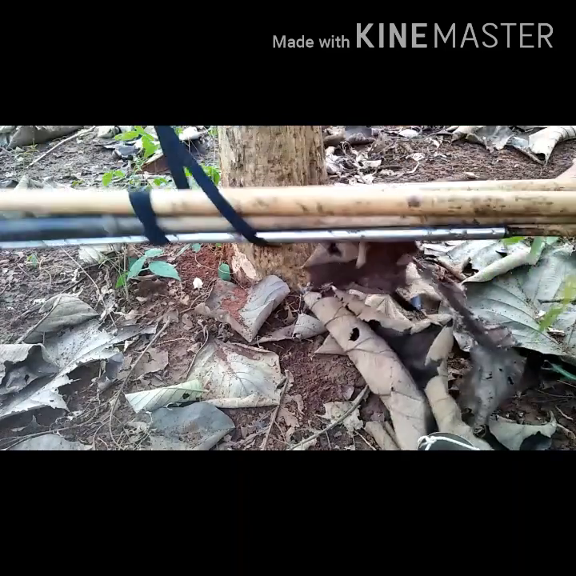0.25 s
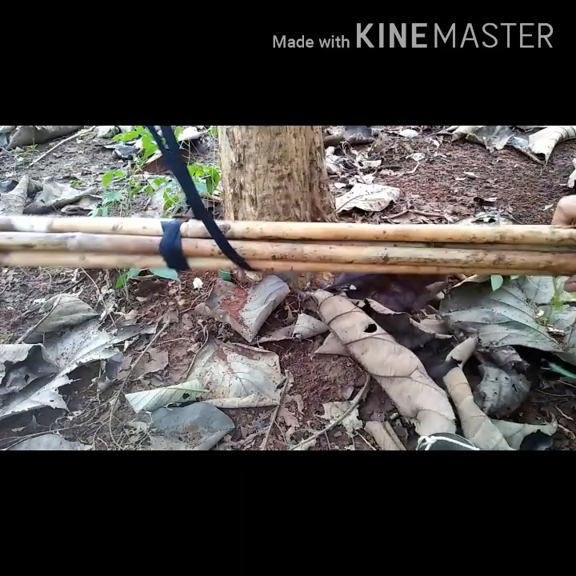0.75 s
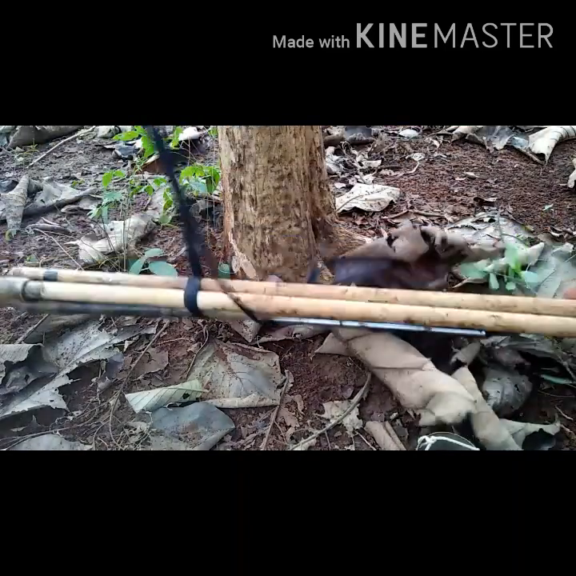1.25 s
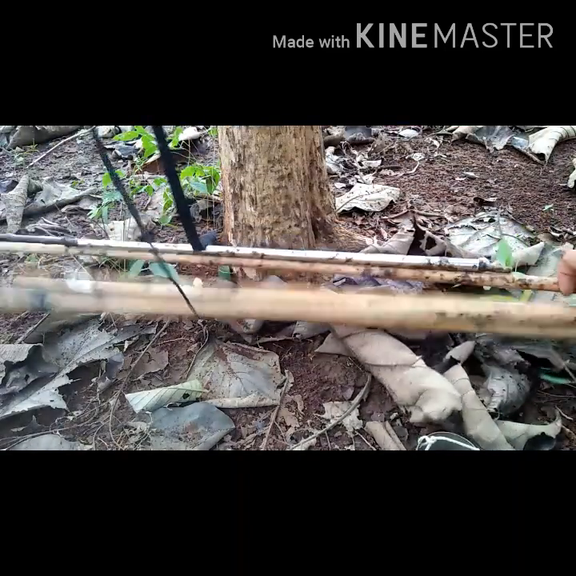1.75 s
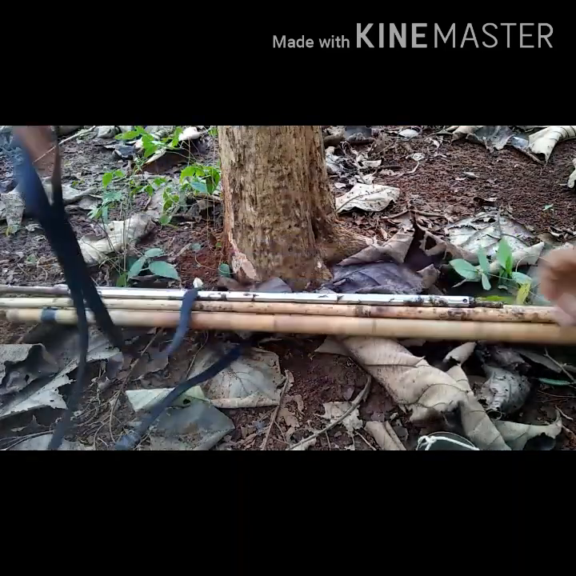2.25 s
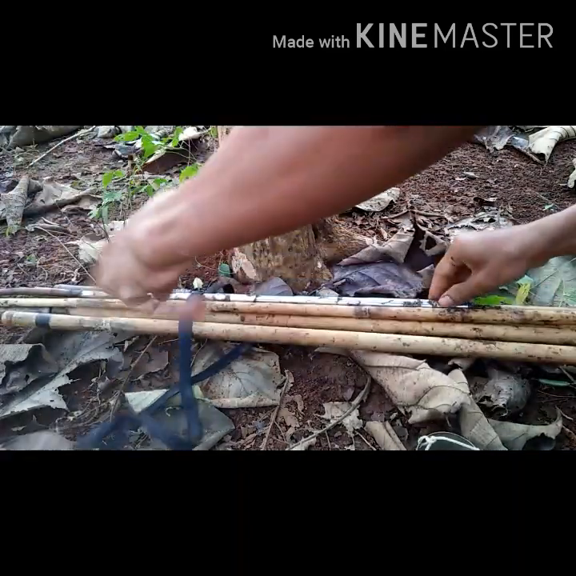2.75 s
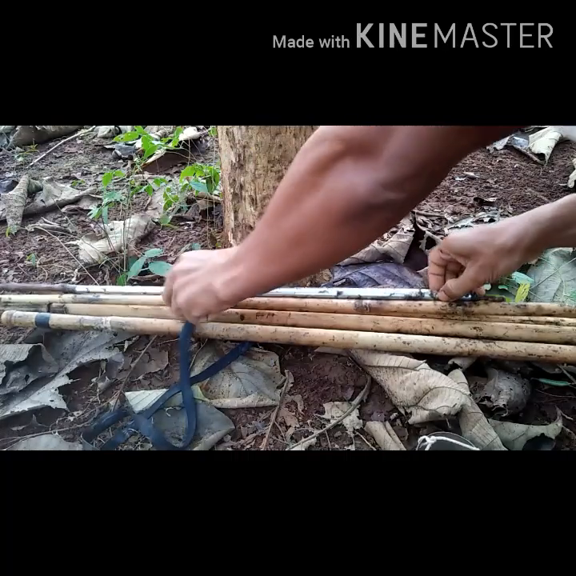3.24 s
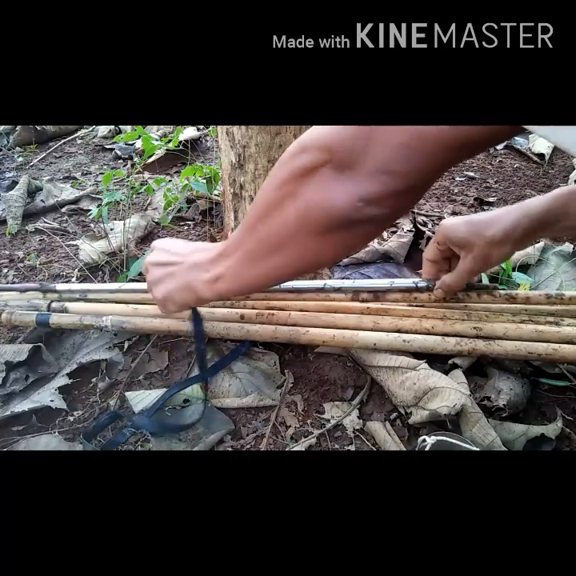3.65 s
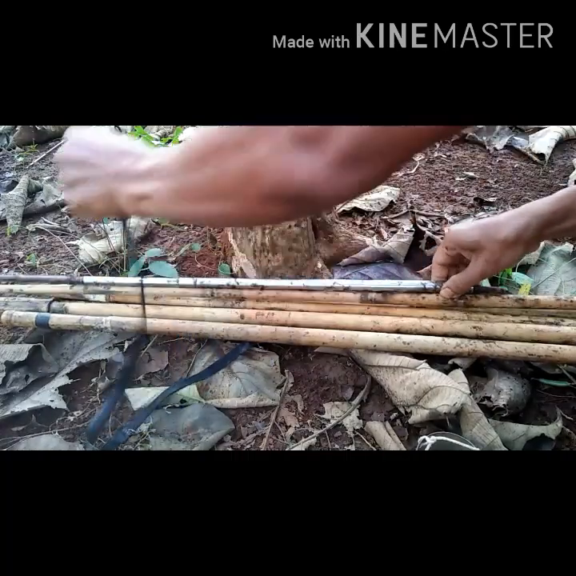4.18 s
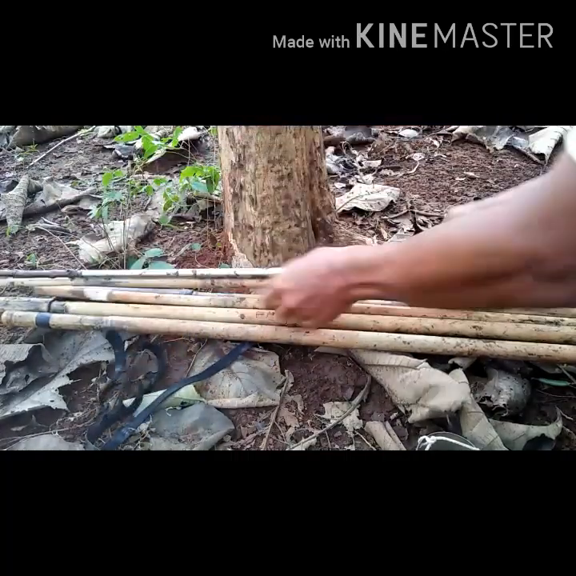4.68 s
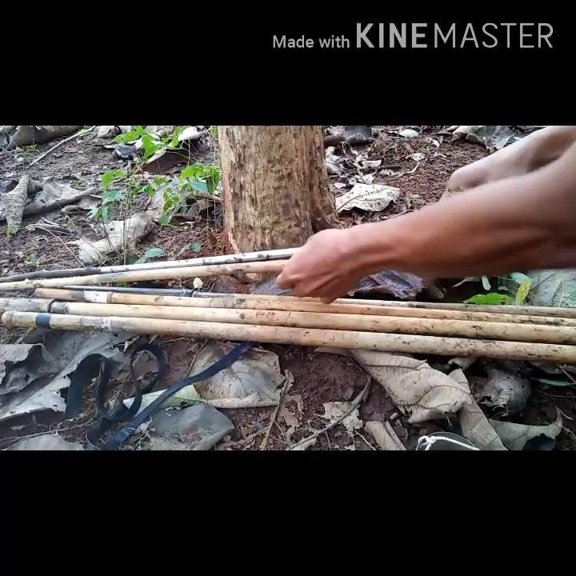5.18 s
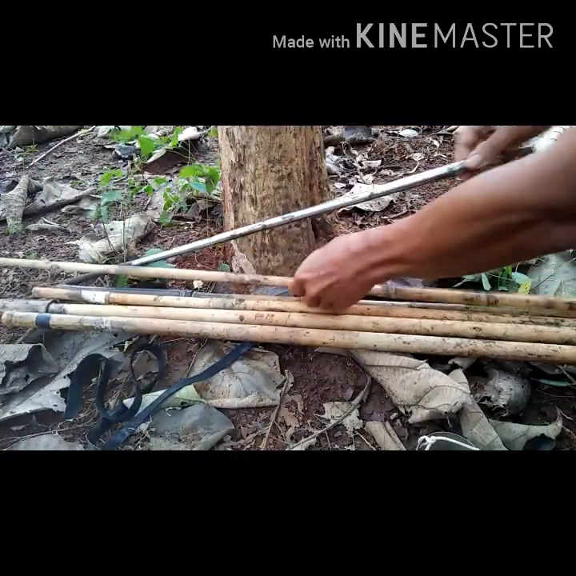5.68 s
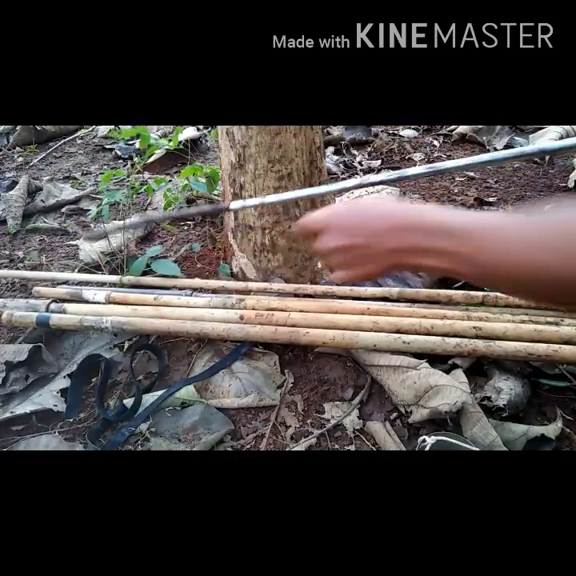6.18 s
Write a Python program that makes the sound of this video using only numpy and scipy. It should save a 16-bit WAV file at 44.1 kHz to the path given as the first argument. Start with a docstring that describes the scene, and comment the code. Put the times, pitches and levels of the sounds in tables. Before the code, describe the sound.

Thin hollow bamboo poles clatter together in a dense burst, then knock loosely while being sorted over rustling dry leaves in quiet woodland.

```python
"""A bundle of thin bamboo poles is lowered onto dry leaves in a wood, unstrapped and sorted, close to a phone.
Rustle, a faint high scrape and a few soft knocks come first; the blows then crowd together and peak near 1.8 s.
After a thin stretch of rustle, a short cluster falls near 4.2 s and a looser one from 5.6 s to the end.
Knocks ring hollow canes and snap their skin; moving hands make poles chatter and leaves and strap rustle in grains.
Throughout, a low rumble comes and goes over quiet air and far insects, and a drone swells out three times."""
import sys
import numpy as np
from scipy import signal
from scipy.fft import rfft, irfft, next_fast_len
from scipy.io import wavfile

SR = 44100
rng = np.random.default_rng(int(sys.argv[2]) if len(sys.argv) > 2 else 0)


def transcribe(signal):
    """Save signal, clipped to [-1, 1], as a 16-bit WAV file at the path in sys.argv[1]."""
    frames = np.atleast_2d(signal).T
    limited = np.clip(frames, -1, 1)
    pcm = np.round(limited * 32767).astype(np.int16)
    wavfile.write(sys.argv[1], SR, pcm)


N = 283122
TIME = np.arange(N) / SR
RING_TIME = np.arange(SR // 5) / SR

# blows of pole against pole, and at 1.145 s a brief scratch of the strap: start_s, ring_level_db,
# tube_pitch_hz, hardness_db_per_octave, click_level_db
KNOCKS = [(0.217, -47.5, 1037, 4, -62), (0.608, -42, 1396, 3, -54), (0.637, -42.5, 1230, 5, -65),
          (0.679, -45.5, 865, 6, -52), (0.835, -36.5, 1310, 4.5, -47.5), (1.128, -44.5, 1110, -1, -65),
          (1.145, -46, 3490, 9, -35.5), (1.275, -43, 1094, 0.5, -60), (1.299, -36.5, 907, -5, -41),
          (1.3117, -25, 2046, 9.5, -27.5), (1.33, -32, 2105, 7, -44), (1.371, -36.5, 987, 5.5, -60),
          (1.432, -40, 1146, 5, -46), (1.461, -40, 803, 7, -39), (1.605, -45, 2020, 7, -35),
          (1.663, -32.5, 1084, 4, -34.5), (1.693, -26, 1410, 3.5, -28.5), (1.707, -25, 957, 6, -33.5),
          (1.725, -33, 1570, -2, -51.5), (1.7615, -24.5, 1430, 0.5, -24), (1.778, -30.5, 1710, 4.5, -34),
          (1.7998, -19.5, 3050, 11.5, -25.5), (1.8769, -30, 1668, 12, -24.5), (1.893, -34, 1930, 8, -37.5),
          (1.901, -31, 1980, 1.5, -28), (1.9197, -30.5, 2005, 12.5, -36), (1.925, -35, 1580, 1, -20.5),
          (1.932, -28, 1500, 2.5, -29.5), (1.985, -34, 1212, -3, -33.5), (2, -39.5, 1030, 2, -47),
          (2.016, -39, 1596, -1, -32.5), (2.054, -48, 2350, 6, -53), (2.078, -41.5, 1187, -5.5, -53),
          (2.164, -39, 1513, -2, -33.5), (2.189, -40, 1330, -8, -31), (2.197, -38, 1660, 9, -28.5),
          (2.217, -31.5, 1440, 0.5, -37), (2.282, -35.5, 1508, 1, -33.5), (2.447, -53, 818, 1, -57),
          (2.53, -29.5, 1222, 6.5, -37), (3.986, -57.5, 1590, -1.5, -77.5),
          (4.101, -55.5, 1950, 0.5, -41.5), (4.127, -44, 1456, 0.5, -51.5), (4.144, -48, 1670, 0, -52),
          (4.185, -36.5, 1140, -1.5, -37.5), (4.2052, -32.5, 1630, 5, -24), (4.218, -33, 1587, 0.5, -38.5),
          (4.24, -37.5, 1070, -0.5, -42.5), (4.363, -55, 1153, -0.5, -82), (4.431, -49, 1610, -2.5, -70),
          (4.495, -55.5, 1255, -3.5, -67), (4.578, -54, 750, 6.5, -67), (4.832, -43.5, 1240, -3, -42),
          (4.876, -52, 1230, -1.5, -59), (4.942, -55, 1236, -1, -56), (5.065, -45.5, 1273, 6, -59.5),
          (5.608, -38.5, 1838, 4, -37.5), (5.7, -40, 1077, 0.5, -41.5), (5.767, -47.5, 884, -2, -62),
          (5.842, -35.5, 967, 2.5, -40.5), (5.868, -33, 1730, 2, -43.5), (5.882, -43.5, 1210, 1, -53),
          (5.963, -37, 1438, 0, -69), (5.995, -46.5, 784, -1, -54), (6.043, -46, 1155, 3, -52),
          (6.063, -46, 1070, 3, -51), (6.112, -46.5, 2084, 3, -51), (6.132, -37.5, 1976, 3.5, -37),
          (6.232, -58.5, 2170, 7, -68)]
# shared modes of the canes: pitch_hz, level_db
CANE_MODES = [(308, -9.5), (460, -4), (624, -7.5), (745, -1), (882, -1), (946, 2.5), (1222, 4.5), (1450, 4),
              (1590, -2.5), (1704, 0.5), (1830, -10.5), (1975, 2.5), (2104, -8.5), (2195, 1), (2440, 1.5),
              (3073, -4)]
# spectrum of the cane wall modes: frequency_hz, level_db
CANE_WALL_SPECTRUM = [(480, -10), (800, -0.5), (1250, 2), (2100, -1.5), (3100, -8), (4000, -12),
                      (5500, -18)]
# spectrum of a snap of hard skin or brittle leaf: frequency_hz, level_db
SNAP_SPECTRUM = [(1000, -24.5), (3500, -10.5), (5500, -1.5), (7800, 6.5), (10000, 5), (12000, -5.5),
                 (14500, -8)]
# hand movements that brush leaves and strap and drag poles over each other:
# start_s, length_s, rustle_level_db, drag_level_db, growth_db (from start to end)
MOVES = [(-0.02, 0.12, -47, -57, -20.5), (0.082, 0.33, -52.5, -56, -5.5), (0.398, 0.27, -54, -59, 9),
         (0.662, 0.069, -53, -52, 11), (0.763, 0.19, -54.5, -60.5, -2.5), (0.94, 0.18, -57.5, -75, 2),
         (1.124, 0.29, -49.5, -52.5, 12), (1.443, 0.24, -49, -51.5, -4.5), (1.708, 0.16, -40.5, -35, -1.5),
         (1.88, 0.14, -40, -36, 1), (2.03, 0.075, -52.5, -62, -11), (2.154, 0.22, -58.5, -53, -30),
         (2.435, 0.12, -56, -63, 16.5), (2.568, 0.049, -62, -67, 7), (2.858, 0.03, -67, -73.5, -4),
         (2.93, 0.078, -58, -60.5, -2.5), (3.01, 0.07, -60, -66.5, 12.5), (3.085, 0.093, -66, -80, 1),
         (3.658, 0.094, -67.5, -72, -5), (3.74, 0.048, -62.5, -82.5, 7), (3.937, 0.28, -69, -74, 4),
         (4.169, 0.12, -50.5, -45.5, -5.5), (4.559, 0.044, -52.5, -50, -6), (4.644, 0.16, -65, -114, -4),
         (4.813, 0.2, -66, -65, -0.5), (5.059, 0.13, -70, -74, -2.5), (5.458, 0.2, -64, -65, 32.5),
         (5.87, 0.14, -64, -58, -3), (6.016, 0.15, -58, -61.5, 15.5), (6.183, 0.097, -60.5, -66, -6),
         (6.252, 0.15, -68.5, -104, 10)]
# a thin pole drawn along its neighbours sings faintly: start_s, length_s, level_db, pitch_hz
SCRAPES = [(0.034, 0.71, -67.5, 3020), (5.193, 0.12, -80, 2825)]
# spectrum of the dry leaves and strap: frequency_hz, level_db
LEAF_SPECTRUM = [(300, -31), (1500, -18), (3000, -15), (4400, -16), (5700, -12), (7500, -5.5), (9300, 0.5),
                 (12000, -9), (14500, -12.5)]
# brittle leaves and twigs snapping: start_s, level_db
LEAF_SNAPS = [(0.733, -49), (1.424, -39), (1.578, -37.5), (1.749, -41), (2.943, -59), (2.99, -50.5),
              (3.164, -63), (3.952, -65.5), (4.152, -45.5), (4.258, -41.5), (4.667, -52.5), (6.146, -47)]
# course of the low rumble, before its surges: time_s, level_db
RUMBLE_LEVEL = [(0, -66.5), (0.45, -78), (0.62, -63.5), (1.9, -64), (2.15, -70.5), (3.4, -80), (4.2, -65),
                (4.95, -71.5), (5.1, -64), (5.8, -63), (6.42, -75)]
# spectrum of the low rumble: frequency_hz, level_db
RUMBLE_SPECTRUM = [(22, -27.5), (48, 0.5), (90, 3), (170, -3.5), (240, -15), (600, -39.5)]
# swells of the low drone: start_s, length_s, level_db, growth_db (from start to end)
DRONE_SWELLS = [(0.578, 0.18, -53, 5), (2.673, 0.081, -55, 6.5), (5.052, 0.65, -55, 3)]
# spectrum of the woodland air: frequency_hz, level_db
AIR_SPECTRUM = [(25, -7.5), (55, -7), (130, -6.5), (250, -12.5), (1000, -17), (3700, -28), (5400, -35),
                (14000, -35)]

# every movement sets in quickly; the leaves settle and the poles come to rest after it
MOVE_ATTACK_S, LEAF_SETTLE_DB_PER_S, POLE_SETTLE_DB_PER_S = 0.034, 199, 138.5
# when a movement stops, its sound drops by this much within this time while it dies away
STOP_DROP_DB, STOP_S = 6.5, 0.011
DRONE_ATTACK_S, DRONE_FADE_DB_PER_S = 0.015, 97.5
# rebound against the blow, skin ping against the snap, buzz against the burst of the snap
BOUNCE_DB, SKIN_PING_DB, SKIN_BUZZ_DB = -17, -6.5, -20
SKIN_PING_HZ = 8350  # centre of the random pitches
INSECT_HZ, INSECT_WIDTH_HZ, INSECT_DB = 4600, 600, -89.5
AIR_DB = -77
TOP_HZ = 14500


def knocks():
    """Poles strike each other, each blow ringing the hollow canes; one brief scratch of the strap sounds the
    same way."""
    out = np.zeros(N)
    for start_s, *blow in KNOCKS:
        add(out, start_s, knock(*blow))
    return out


def knock(ring_db, tube_hz, hardness_db, click_db):
    """One blow: a dominant tube resonance, wall modes, the cane ring and a click of the skin."""
    # the levels hold for the first moments of ring and click
    ring_s, click_s, build_s = .012, .004, .0006
    # hard, glancing contacts excite the modes that die soonest
    shorten = np.exp(-.09 * hardness_db)
    wall = unit(wall_ring(hardness_db, 0.092 * shorten, scatter_db=2.5), ring_s)
    tube = unit(np.sin(2 * np.pi * tube_hz * RING_TIME) * fade(0.09 * shorten), ring_s)
    canes = unit(cane_ring(hardness_db), ring_s)
    ring = wall + undb(-3.0) * tube + undb(-5.0) * canes
    # the ring builds up as bending waves spread along the pole
    ring = ring * (1 - np.exp(-RING_TIME / build_s))
    # the loose pole rebounds once, more weakly
    lag = int(SR * rng.uniform(.008, .035))
    ring = ring + undb(BOUNCE_DB) * np.pad(ring, (lag, 0))[:len(ring)]
    click = snap(0.015, SKIN_BUZZ_DB) + undb(SKIN_PING_DB) * skin_ping(click_s)
    return undb(ring_db) * unit(ring, ring_s) + undb(click_db) * unit(click, click_s)


def cane_ring(hardness_db):
    """The ring of the canes, a set of slightly detuned modes."""
    hz, db = np.transpose(CANE_MODES)
    return struck(hz, db, hardness_db, t60_at_1khz=0.1, damping=0.61, scatter_db=7.5, detune=.02)


def wall_ring(hardness_db, t60, scatter_db, count=28):
    """The crowded, unevenly spaced modes of whichever cane walls touch."""
    wall_hz, wall_db = np.transpose(CANE_WALL_SPECTRUM)
    # one mode at a random place in each equal slice of the range
    place = (np.arange(count) + rng.random(count)) / count
    hz = np.interp(place, [0, 1], wall_hz[[0, -1]])
    db = np.interp(hz, wall_hz, wall_db)
    return struck(hz, db, hardness_db, t60, damping=.6, scatter_db=scatter_db, detune=.02)


def struck(hz, db, hardness_db, t60_at_1khz, damping, scatter_db, detune):
    """Modes weighted anew by the place of each blow; high modes die sooner, by a power of their frequency."""
    place, shift, phase_turns = rng.standard_normal((3, len(hz)))
    khz = hz / 1000
    # a soft, long contact excites modes above its corner only weakly
    corner_hz = 2900 * 2 ** (hardness_db / 14)
    tilt_db = hardness_db * np.log2(khz)
    gain = undb(db + scatter_db * place + tilt_db) / np.sqrt(1 + (hz / corner_hz) ** 8)
    turns = np.outer(hz * (1 + detune * shift), RING_TIME) + phase_turns[:, None]
    waves = np.sin((2 * np.pi * turns).astype(np.float32))
    return gain @ (waves * fade(t60_at_1khz / khz[:, None] ** damping))


def skin_ping(level_span_s):
    """The hard skin pings briefly as it snaps, at a slightly different pitch each time."""
    ping_hz = SKIN_PING_HZ * (1 + .08 * rng.standard_normal())
    return unit(np.sin(2 * np.pi * ping_hz * RING_TIME) * fade(.008), level_span_s)


def snap(t60, buzz_db):
    """A brittle surface gives way once, then buzzes faintly; every spot has its own colour."""
    buzz = undb(buzz_db + 4 * walk(350, RING_TIME)) * fade(.08)
    burst = (fade(t60) + buzz) * (1 - fade(.002))  # the last factor softens the onset
    spot = [(hz, db + 3 * rng.standard_normal()) for hz, db in SNAP_SPECTRUM]
    return unit(colour(rng.standard_normal(len(RING_TIME)) * burst, spot), .004)


def sliding(count=16):
    """Canes dragged over each other catch and slip, each slip a tiny knock; every touching spot has its notes."""
    chatter = 0
    for _ in range(count):
        walls = wall_ring(1, t60=.035, scatter_db=6)
        ring = (unit(walls) + undb(-7.5) * unit(cane_ring(0))) * (1 - fade(0.007))
        slips = grains(per_s=24, spread_db=3.5)
        chatter = chatter + unit(signal.oaconvolve(slips, ring)[:N])
    drag = sum(swell(start_s, length_s, drag_db, growth_db, MOVE_ATTACK_S, POLE_SETTLE_DB_PER_S, STOP_DROP_DB)
               for start_s, length_s, _, drag_db, growth_db in MOVES)
    return unit(chatter) * drag


def scrapes():
    """Steady sliding keeps one high wall resonance going, unevenly."""
    sung = sum(narrow_noise(hz, 450) * swell(start_s, length_s, db, 0, MOVE_ATTACK_S, POLE_SETTLE_DB_PER_S)
               for start_s, length_s, db, hz in SCRAPES)
    return sung * undb(2.5 * walk(40))


def rustle():
    """Dry leaves and the strap brush along the poles: fine grains whose colour shifts as the contact moves."""
    brush = 0
    for hz in np.geomspace(500, 13500, 22):
        band = signal.butter(2, [hz / 1.082, hz * 1.082], "band", fs=SR, output="sos")
        brush = brush + signal.sosfilt(band, rng.standard_normal(N)) * undb(3 * walk(35))
    # brittle leaves crackle mostly in the treble
    burst = rng.standard_normal(len(RING_TIME)) * fade(.005)
    tick = signal.sosfilt(signal.butter(1, 2000, "high", fs=SR, output="sos"), burst)
    crackle = unit(signal.fftconvolve(grains(per_s=80, spread_db=5), tick)[:N])
    leaves = unit(colour(unit(brush) + undb(-1.5) * crackle, LEAF_SPECTRUM))
    # the pressure of the rub is never even
    flutter_db = 2.2 * walk(60)
    rub = sum(swell(start_s, length_s, rustle_db, growth_db, MOVE_ATTACK_S, LEAF_SETTLE_DB_PER_S, STOP_DROP_DB)
              for start_s, length_s, rustle_db, _, growth_db in MOVES)
    return leaves * rub * undb(flutter_db)


def leaf_snaps():
    """Single dry cracks of leaves and twigs that stand out of the rustle."""
    out = np.zeros(N)
    for start_s, db in LEAF_SNAPS:
        add(out, start_s, undb(db) * snap(0.011, buzz_db=-25.5))
    return out


def woodland(x, echo_db=-23, t60=0.11):
    """Faint scatter from the ground and trunks, duller than the direct sound."""
    tail = rng.standard_normal(SR) * undb(-60 * TIME[:SR] / t60)
    dull = signal.butter(1, 3500, fs=SR, output="sos")
    tail = signal.sosfilt(dull, tail / np.linalg.norm(tail))
    return x + undb(echo_db) * signal.fftconvolve(x, tail)[:N]


def background():
    """Everything behind the poles: low rumble, drone, air and insects."""
    return rumble() + drone() + air() + insects()


def rumble():
    """Low-coloured noise that comes and goes, with uneven surges."""
    level_db = np.interp(TIME, *np.transpose(RUMBLE_LEVEL))
    surge_db = 2.2 * walk(16)
    return unit(colour(rng.standard_normal(N), RUMBLE_SPECTRUM)) * undb(level_db + surge_db)


def drone(pitch_hz=81):
    """A low tone and its fainter octave, wavering in pitch and level, swell out three times."""
    turns = np.cumsum(pitch_hz + 3 * walk(22)) / SR
    octave = undb(-15.5) * np.sin(2 * np.pi * 2 * turns)
    swells = sum(swell(*row, DRONE_ATTACK_S, DRONE_FADE_DB_PER_S) for row in DRONE_SWELLS)
    return (np.sin(2 * np.pi * turns) + octave) * swells * undb(3 * walk(27))


def air():
    """Quiet woodland air: coloured noise with a slow wander in level."""
    return unit(colour(rng.standard_normal(N), AIR_SPECTRUM)) * undb(AIR_DB + walk(3))


def insects():
    """Far insects: a narrow band of noise that wavers in level."""
    return narrow_noise(INSECT_HZ, INSECT_WIDTH_HZ) * undb(INSECT_DB + 2.2 * walk(5))


def swell(start_s, length_s, db, growth_db, attack_s, fall_db_per_s, drop_db=0):
    """Envelope of one gesture: a quick rise, a hold that grows or wanes, an optional drop and a steady fall."""
    age = TIME - start_s
    after = np.clip(age - length_s, 0, 1)
    hold_db = growth_db * (np.clip(age / length_s, 0, 1) - .5)  # db is reached halfway
    release_db = drop_db * np.minimum(after / STOP_S, 1) + fall_db_per_s * after
    return np.clip(age / attack_s, 0, 1) * undb(db + hold_db - release_db)


def grains(per_s, spread_db):
    """Random tiny impacts, most of them weak and a few strong."""
    count, out = int(per_s * N / SR), np.zeros(N)
    size_db = spread_db * np.minimum(rng.exponential(size=count), 3)
    out[rng.integers(0, N, count)] = rng.choice([-1, 1], count) * undb(size_db)
    return unit(out)


def narrow_noise(hz, width_hz):
    """Noise in one resonance."""
    band = signal.butter(2, [hz - width_hz / 2, hz + width_hz / 2], "band", fs=SR, output="sos")
    return unit(signal.sosfilt(band, rng.standard_normal(N)))


def colour(x, points):
    """Causal minimum-phase filter with the given spectrum, drawn straight over octaves."""
    size = 2 * next_fast_len(len(x))
    hz, db = np.transpose(points)
    octave = np.log2(np.maximum(np.arange(size // 2 + 1) * SR / size, 1))
    # folding the cepstrum onto positive times makes the filter causal
    cepstrum = irfft(np.interp(octave, np.log2(hz), db) * np.log(10) / 20)
    cepstrum[1:size // 2] *= 2
    cepstrum[size // 2 + 1:] = 0
    return irfft(rfft(x, size) * np.exp(rfft(cepstrum)))[:len(x)]


def walk(rate, time=TIME):
    """Random wander: normal draws at this many per second, joined by straight lines."""
    return np.interp(time * rate, np.arange(len(time)), rng.standard_normal(len(time)))


def fade(t60):
    """Exponential decay of a ring, down 60 dB after t60 seconds."""
    return np.exp((-np.log(1000) * RING_TIME / t60).astype(np.float32))


def unit(x, span_s=None):
    """Scale to rms 1, over the whole sound or over its first moments."""
    head = x if span_s is None else x[:int(span_s * SR)]
    return x / np.sqrt(np.mean(head ** 2) + 1e-20)


def undb(db):
    """Decibels to gain."""
    return 10 ** (np.asarray(db) / 20)


def add(track, start_s, sound):
    """Mix a sound into a track at a time."""
    start = int(start_s * SR)
    track[start:start + len(sound)] += sound[:N - start]


def scene():
    """Poles and leaves among the trees, over the background."""
    poles = knocks() + sliding() + scrapes()
    leaves = rustle() + leaf_snaps()
    return (woodland(poles + leaves) + background())[None]


def record(dry):
    """The phone cuts the top with a steep low-pass."""
    return signal.sosfilt(signal.ellip(10, .2, 70, TOP_HZ, fs=SR, output="sos"), dry)


dry = scene()
out = record(dry)
transcribe(out)
```